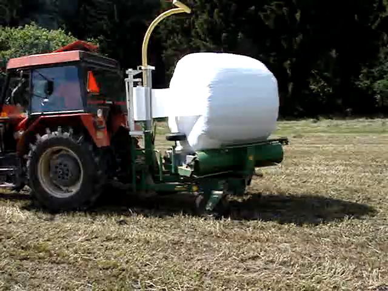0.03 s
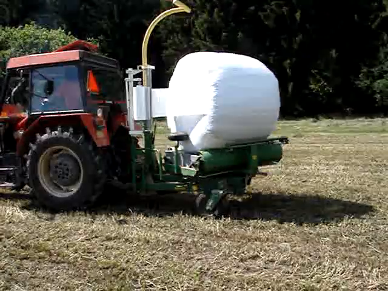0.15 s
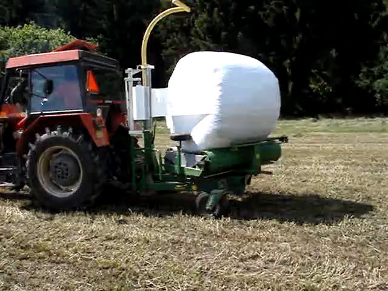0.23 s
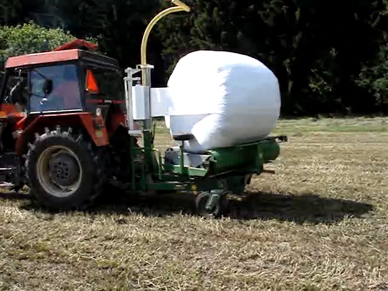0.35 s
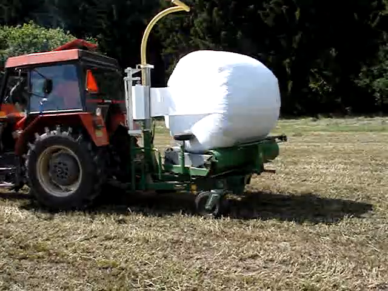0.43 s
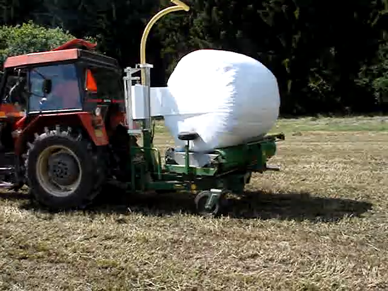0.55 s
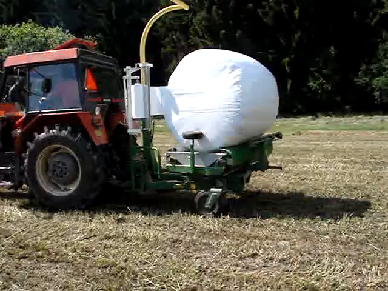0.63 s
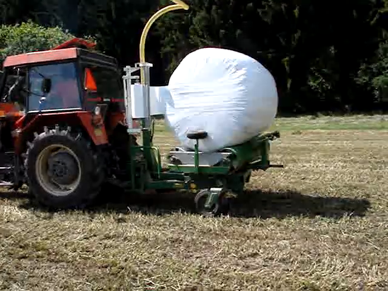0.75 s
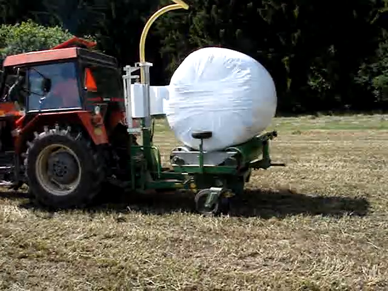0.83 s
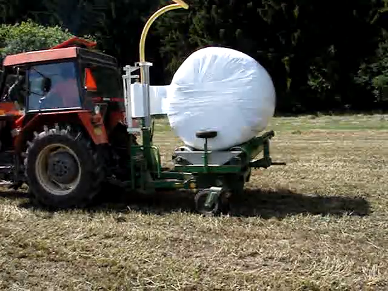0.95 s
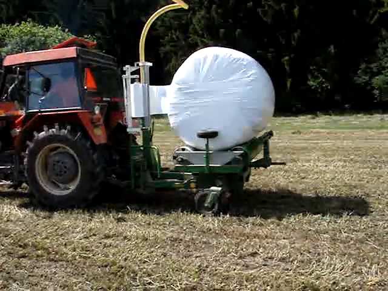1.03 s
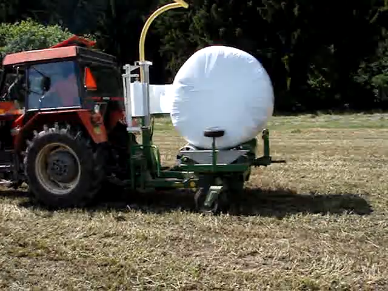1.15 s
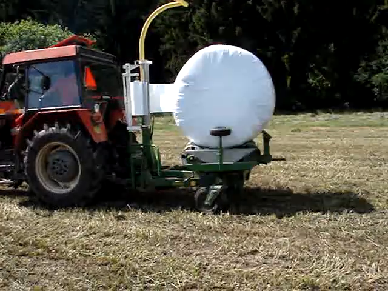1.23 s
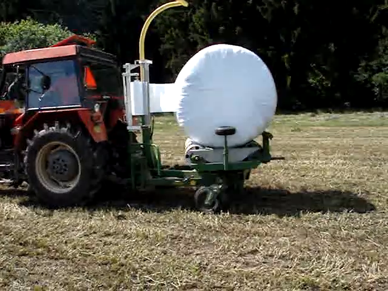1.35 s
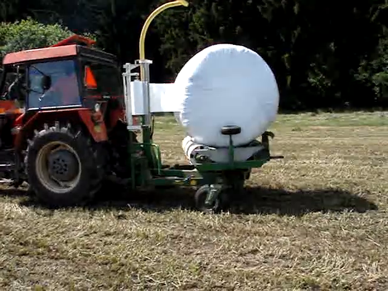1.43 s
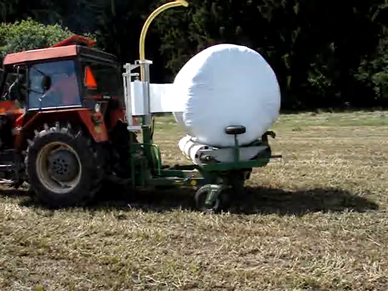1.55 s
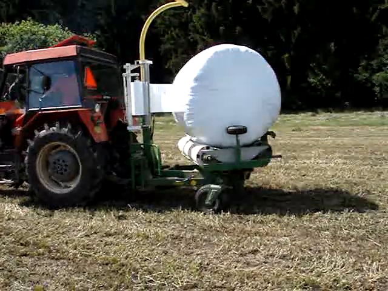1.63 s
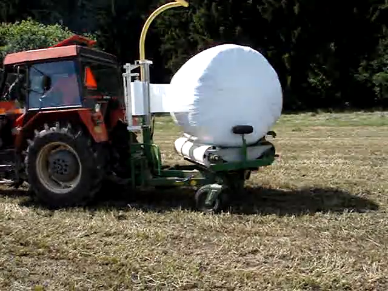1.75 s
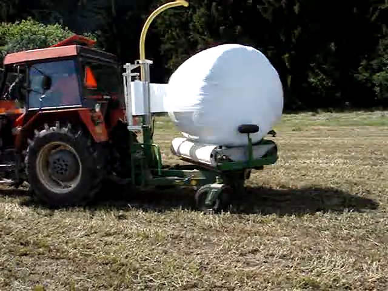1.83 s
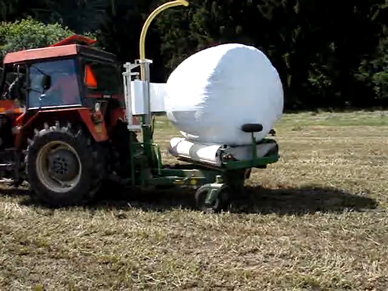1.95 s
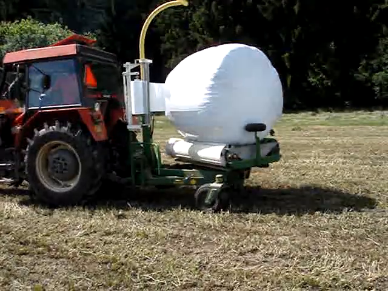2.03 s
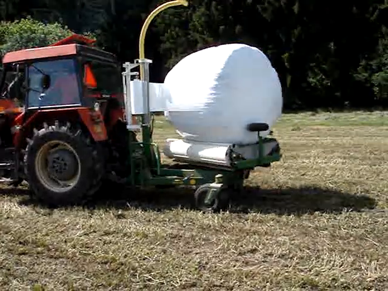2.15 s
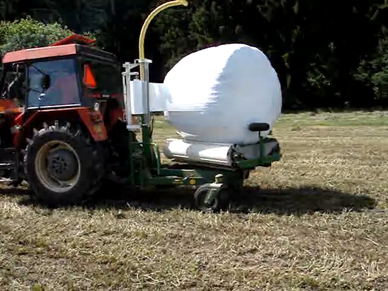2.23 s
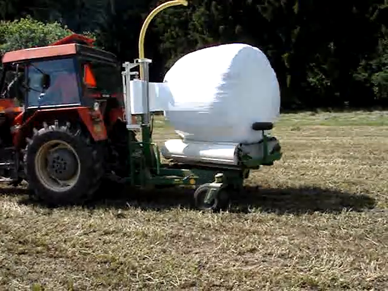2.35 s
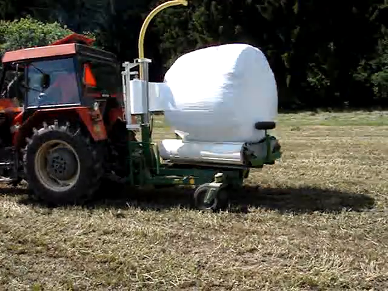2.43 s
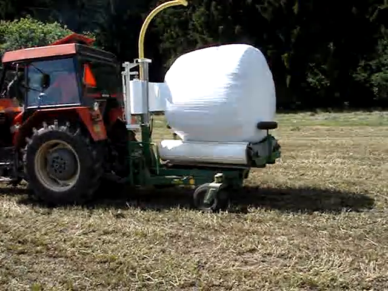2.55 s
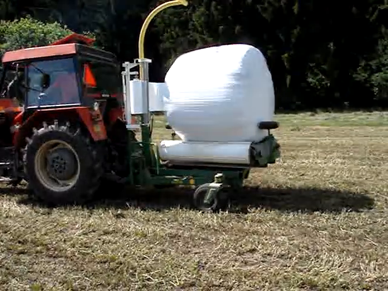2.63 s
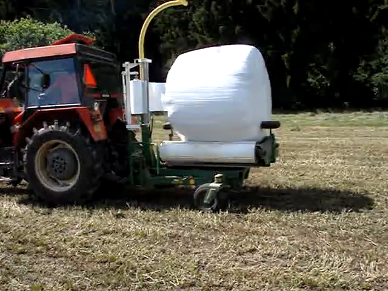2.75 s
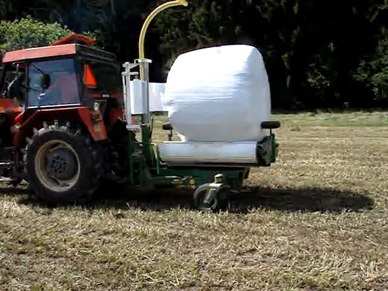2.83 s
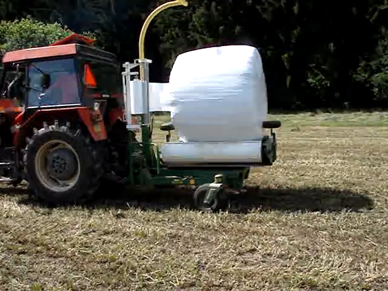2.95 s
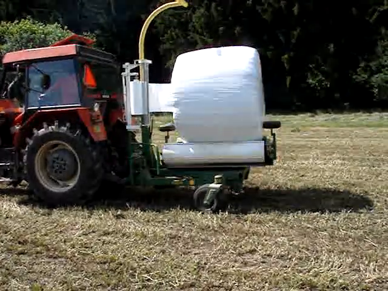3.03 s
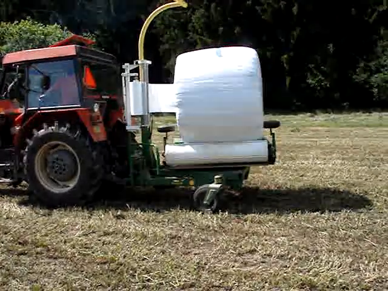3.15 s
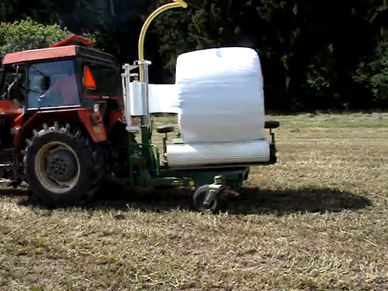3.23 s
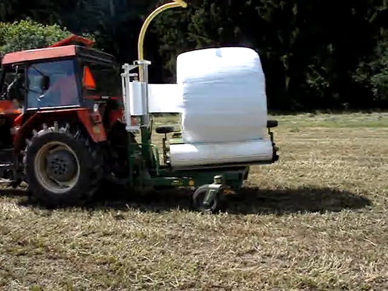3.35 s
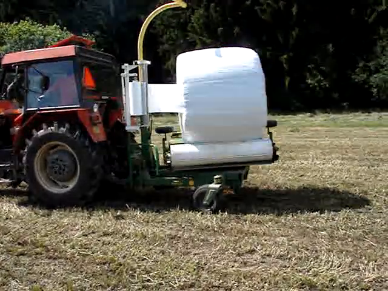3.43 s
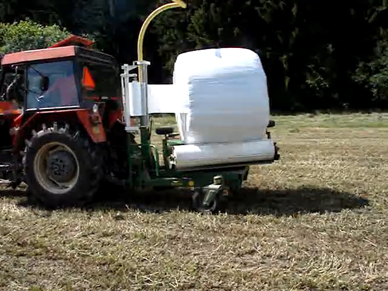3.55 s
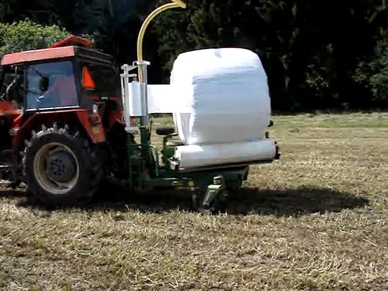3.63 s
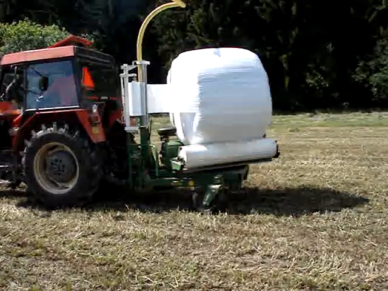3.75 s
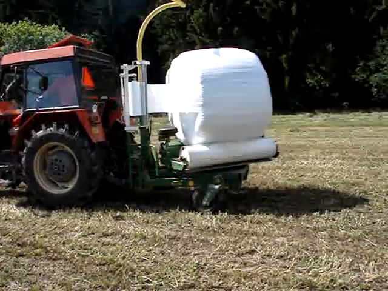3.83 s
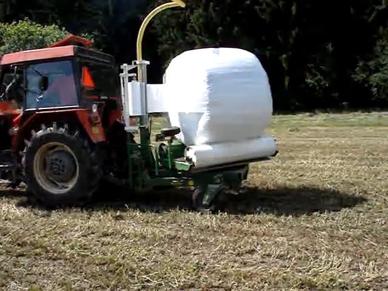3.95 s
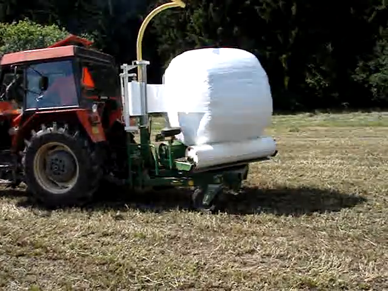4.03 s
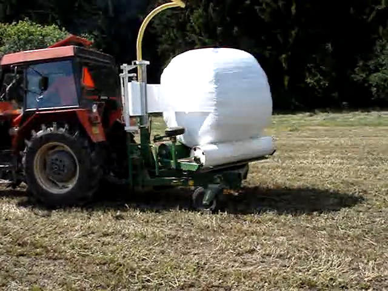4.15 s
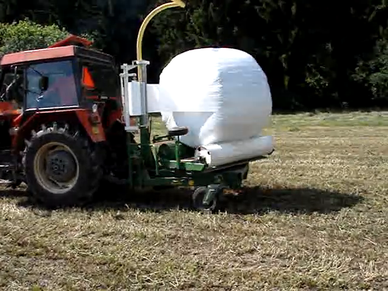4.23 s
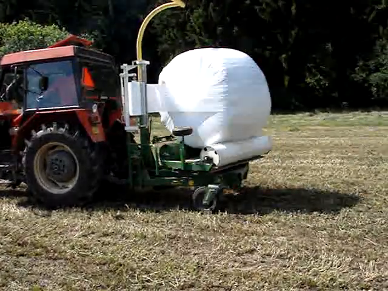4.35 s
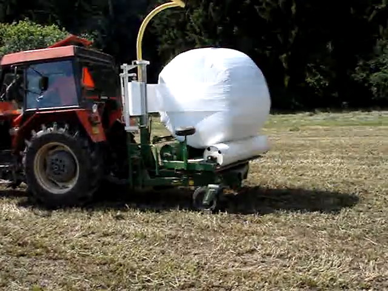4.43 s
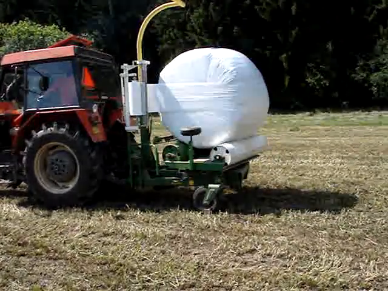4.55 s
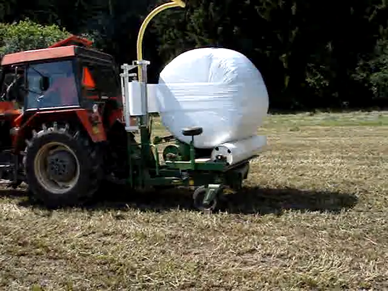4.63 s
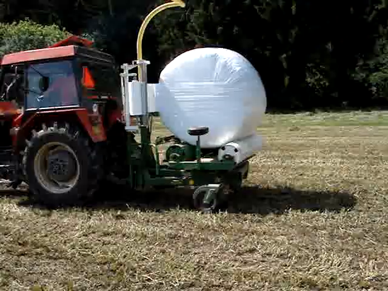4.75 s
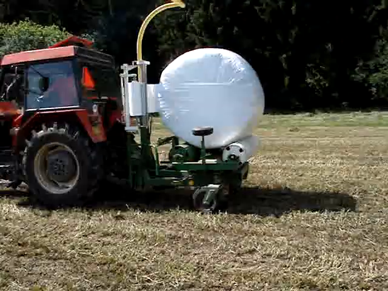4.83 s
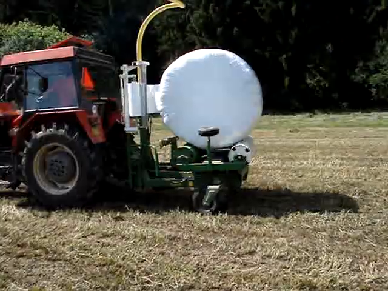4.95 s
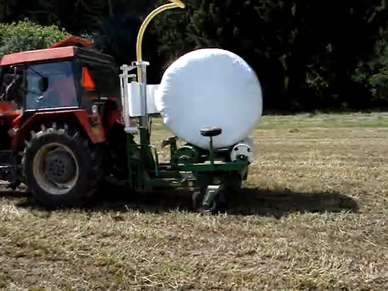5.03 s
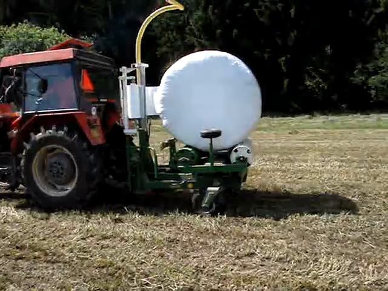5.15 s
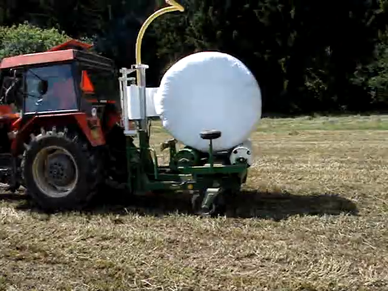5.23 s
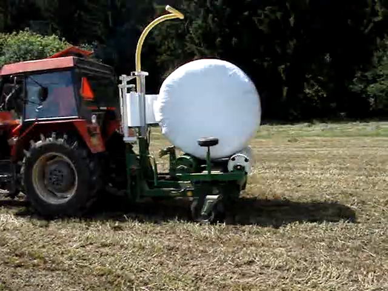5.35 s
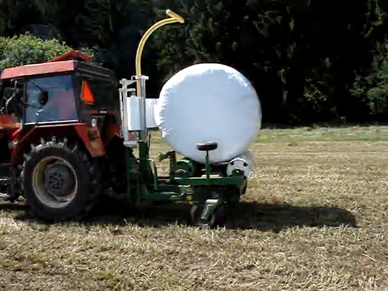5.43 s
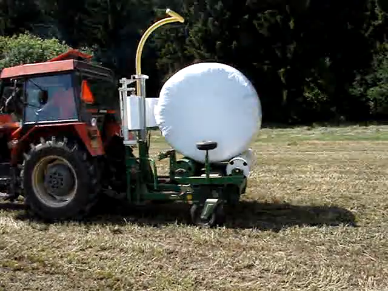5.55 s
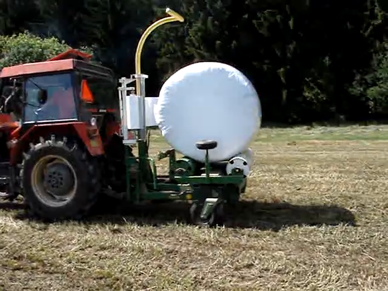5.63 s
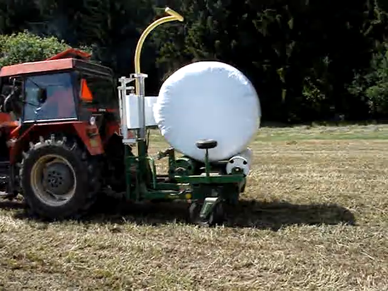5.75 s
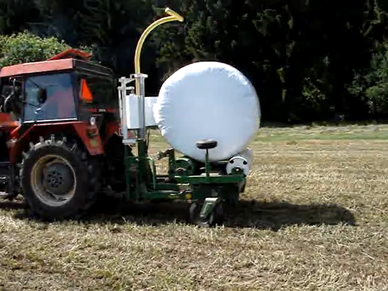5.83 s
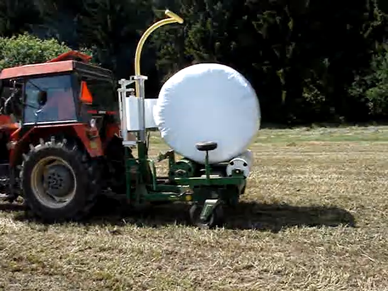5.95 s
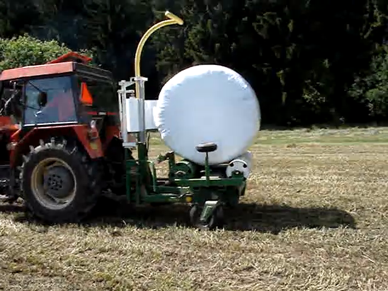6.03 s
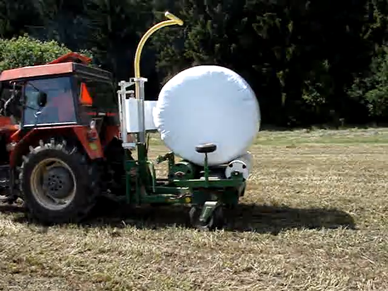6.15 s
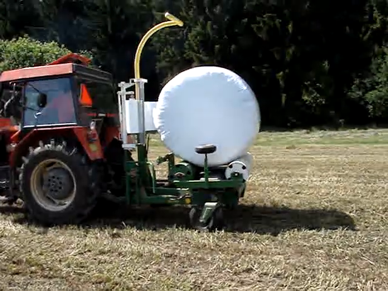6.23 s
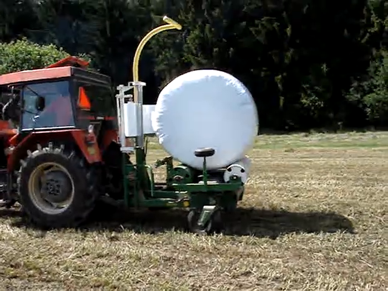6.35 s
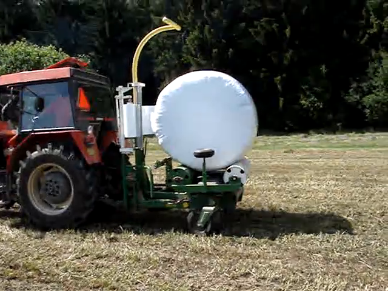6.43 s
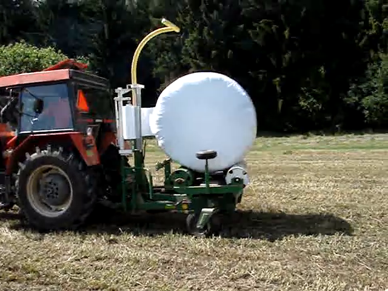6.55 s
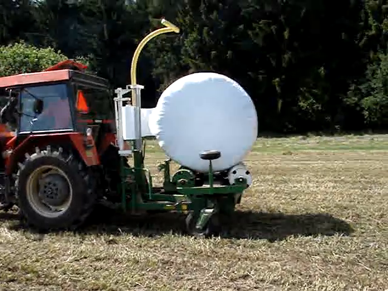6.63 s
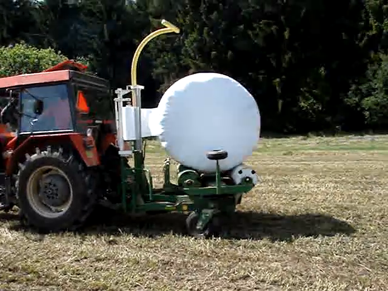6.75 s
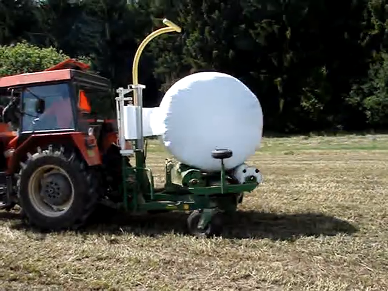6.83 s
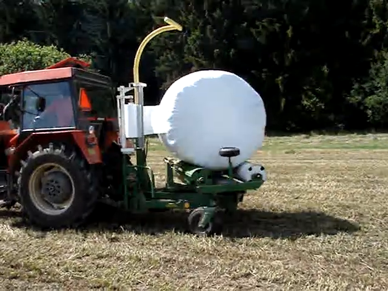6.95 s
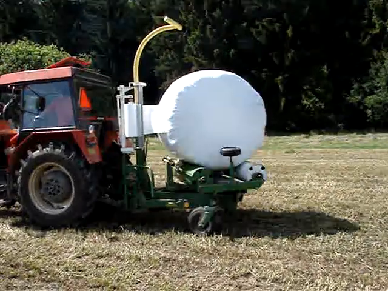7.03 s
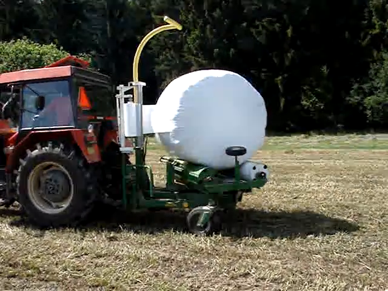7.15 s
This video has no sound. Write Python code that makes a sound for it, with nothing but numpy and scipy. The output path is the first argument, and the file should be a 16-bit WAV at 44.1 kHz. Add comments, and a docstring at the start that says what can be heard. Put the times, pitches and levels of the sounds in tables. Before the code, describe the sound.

Stretch film peels off a bale wrapper's roll with a dense, bright crackle and a rasp, while a diesel tractor idles underneath. After about five seconds the film stops, and the engine's knock and a low hydraulic hum come forward. A valve clacks, and the film starts tearing again. The machine stands straight ahead of the microphone in an open field.

```python
"""Stretch film rips off a bale wrapper's roll in thousands of tiny slips a second, which crackle at
the peel line and rasp on the taut sheet. A four-cylinder diesel tractor idles in front, in an open field.
The turntable brakes to a stop, the hydraulic pump's hum swells, and the engine's knock comes forward
as the recorder's gain control recovers. Then a valve clacks and the film tears on."""
import sys
import numpy as np
from scipy import signal
from scipy.fft import rfft, irfft
from scipy.io import wavfile
from scipy.ndimage import uniform_filter1d

SR = 44100
rng = np.random.default_rng(int(sys.argv[2]) if len(sys.argv) > 2 else 0)


def master_out(mix):
    """Clip the mix to full scale and print it as 16-bit PCM to the path in sys.argv[1]."""
    frames = np.transpose(np.atleast_2d(mix))
    ceiling = np.clip(frames, -1, 1)
    pcm = np.round(ceiling * 32767).astype(np.int16)
    wavfile.write(sys.argv[1], SR, pcm)


N = 317066
TIME = np.arange(N) / SR
STOP_S, START_S = 5.282, 6.659  # the turntable rests between these moments


def from_db(db):
    """Decibels to amplitude."""
    return 10 ** (np.asarray(db) / 20)


def rms_one(x):
    """The signal scaled to an rms of 1."""
    return x / np.sqrt(np.mean(x ** 2) + 1e-20)


def ramp(age, length_s):
    """Straight rise from 0 to 1."""
    return np.clip(age / length_s, 0, 1)


def swell(s, half_s):
    """Smooth bump of height 1 around a moment."""
    return np.exp(-((TIME - s) / half_s) ** 2)


def burst(age, rise_s, decay_s):
    """Envelope that swells quickly and dies away."""
    age = np.maximum(age, 0)
    return (1 - np.exp(-age / rise_s)) * np.exp(-np.minimum(age / decay_s, 50))


def drift(hz):
    """Smooth random wander of rms 1, mostly slower than hz."""
    hop, settle = 40, 2000
    r = np.exp(-2 * np.pi * hz * hop / SR)
    slow = signal.lfilter([1], [1, -2 * r, r * r], rng.standard_normal(N // hop + settle + 2))[settle:]
    return np.interp(np.arange(N) / hop, np.arange(len(slow)), rms_one(slow))


def clicks(per_s, spread_db):
    """Random train of tiny impulses of uneven size; rms 1."""
    sizes = from_db(spread_db * np.clip(rng.standard_normal(N), -2, 2)) * rng.choice([-1, 1], N)
    return rms_one(sizes * (rng.random(N) < per_s / SR))


def colour(x, spectrum, size=4096):
    """Minimum-phase EQ of unit power gain, falling steeply beyond the spectrum's ends."""
    hz, db = np.transpose(spectrum)
    octave = np.log2(np.maximum(np.fft.rfftfreq(size, 1 / SR), 1))
    knots = np.log2(hz)
    outside = np.abs(octave - np.clip(octave, knots[0], knots[-1]))
    curve_db = np.interp(octave, knots, db) - 60 * np.minimum(outside, 1)
    cepstrum = irfft(np.log(from_db(curve_db)))
    cepstrum[1:size // 2] *= 2  # folded, so nothing rings ahead of a click
    cepstrum[size // 2 + 1:] = 0
    response = irfft(np.exp(rfft(cepstrum)))
    return signal.fftconvolve(x, response / np.linalg.norm(response))[:N]


def resonance(x, hz, width):
    """Two-pole band-pass with gain 1 at its peak; width in Hz."""
    r = np.exp(-np.pi * width / SR)
    poles = [1, -2 * r * np.cos(2 * np.pi * hz / SR), r * r]
    return signal.lfilter(np.array([1, 0, -1]) * (1 - r * r) / 2, poles, x)


def tone(cycles, db):
    """Sine at an rms level in dB."""
    return from_db(db) * np.sqrt(2) * np.sin(2 * np.pi * cycles)


def pump_hum(firings):
    """The hydraulic pump hums at nine times the firing rate, loudest while the turntable rests."""
    work_db, rest_db = -69, -57.5
    resting = ramp(TIME - 5.44, length_s=0.15) - ramp(TIME - START_S, length_s=0.27)
    return tone(9 * firings, work_db + (rest_db - work_db) * resting + 2.2 * drift(9))


def exhaust_drone(firings):
    """Exhaust and belt-driven fan hold low tones that follow the engine's speed."""
    # The drone's partials. Each row: multiple of the firing rate, level in dB.
    partials = [(2, -73.5), (3.08, -71), (4, -69.5), (5, -73), (6, -72.5), (7, -71), (8, -67.5), (18, -72)]
    return sum(tone(order * firings + rng.random(), db + 1.3 * drift(3)) for order, db in partials)


def engine_rumble(age):
    """A bed of low noise that throbs just after each firing."""
    # The rumble's colour. Each row: frequency in Hz, relative level in dB.
    rumble_eq = [(35, -41), (60, -15), (155, -9.5), (204, -3.5), (236, -6), (407, -6), (579, -25.5),
                 (841, -11.5), (900, -5), (1170, -38), (1980, -120)]
    throb = rms_one(1 + 1.1 * burst(age - 0.008, rise_s=0.004, decay_s=0.02))
    rumble = colour(rng.standard_normal(N), rumble_eq) * throb
    return from_db(-54) * signal.sosfilt(signal.butter(2, 70, "high", fs=SR, output="sos"), rumble)


def diesel_knock(firings, age):
    """Every firing knocks on the block, and the valve gear clatters after it."""
    # The accent of each cylinder in dB, in firing order.
    cylinder_db = [2.5, -0.5, -0.2, 0]
    # The colour of knock and clatter. Each row: frequency in Hz, relative level in dB.
    knock_eq = [(260, -28.5), (450, -14), (585, -8), (903, -5), (1040, -11.5), (1220, -6), (1530, -3.5),
                (1760, -8.5), (2240, -4), (2420, -9.5), (3780, -14.5), (5180, -23.5), (6070, -25),
                (9240, -31), (10400, -43.5), (13500, -86), (22000, -120)]
    # The ring of the engine block. Each row: frequency in Hz, width in Hz, relative level in dB.
    block_modes = [(1240, 78, -4.5), (1340, 70, -1.5), (1550, 82, -7), (2245, 61, -7), (2860, 220, -1),
                   (3730, 170, 4), (4400, 390, -2.5), (5900, 440, -1.5)]
    cylinder = np.floor(firings).astype(int) % len(cylinder_db)
    strength = from_db(np.array(cylinder_db)[cylinder] + 0.82 * drift(8.9))
    blows = strength * burst(age, rise_s=0.00091, decay_s=0.015)
    knock = colour(blows * clicks(per_s=20000, spread_db=1.5), knock_eq)
    # no two blows excite the block's modes alike
    ring = sum(from_db(db + 2 * drift(9.2)) * resonance(knock, hz, width)
               for hz, width, db in block_modes)
    gear_pulse = rms_one(0.54 + burst(age - 0.013, rise_s=0.0015, decay_s=0.014))
    clatter = colour(gear_pulse * clicks(per_s=6000, spread_db=2), knock_eq)
    return from_db(-40) * rms_one(0.38 * knock + ring) + from_db(-44) * clatter


def tractor():
    """The idling diesel: knock, rumble, exhaust and pump all keep time with its firings."""
    # The slightly uneven idle. Each row: time in seconds, firings per second.
    idle_speed = [(0, 22.8), (5.1, 22.6), (5.3, 21.9), (5.6, 22.05), (5.68, 23.0), (6.55, 23.0),
                  (6.61, 22.1), (7.19, 22.6)]
    first_cylinder_s = 5.677  # a moment at which the first cylinder fires
    firing_hz = np.interp(TIME, *np.transpose(idle_speed))
    firings = np.cumsum(firing_hz) / SR
    firings -= np.interp(first_cylinder_s, TIME, firings)
    age = firings % 1 / firing_hz  # seconds since the last firing
    return diesel_knock(firings, age) + engine_rumble(age) + exhaust_drone(firings) + pump_hum(firings)


def valve_clack(at_s):
    """The hydraulic valve opens with a spit, a short rush and a metal ring."""
    # The colour of the rush. Each row: frequency in Hz, relative level in dB.
    rush_eq = [(400, -16), (700, -2), (1300, -2), (1900, 2), (2600, 2), (3900, -4), (5000, -9), (8500, -25),
               (10000, -36)]
    # The valve's ring. Each row: frequency in Hz, level in dB, seconds to fade by 60 dB.
    valve_modes = [(563, -46, 0.66), (690, -41, 0.33), (1860, -25.5, .08)]
    age = np.maximum(TIME - at_s, 0)
    spit = burst(age, rise_s=0.0005, decay_s=0.01) * rng.standard_normal(N)
    spit = resonance(resonance(spit, hz=7600, width=2700), hz=7600, width=2700)
    rush = colour(burst(age, rise_s=0.0057, decay_s=0.028) * rng.standard_normal(N), rush_eq)
    ring = sum(from_db(db) * burst(age, 0.0068, t60 / np.log(1000)) * np.sin(2 * np.pi * hz * age)
               for hz, db, t60 in valve_modes)
    return from_db(-28.5) * spit + from_db(-27.5) * rush + ring


def turntable_speed():
    """Share of full speed: the turntable brakes, rests, jerks off at part speed and runs up."""
    jerk_speed = 0.51
    run_up = jerk_speed + (1 - jerk_speed) * ramp(TIME - START_S, length_s=0.13)
    return ramp(STOP_S - TIME, length_s=0.084) + (TIME > START_S) * run_up


def film_gains():
    """Gains of rasp and crackle: both ride the film's speed and the pull on it."""
    # The pull sways as bale and roll turn.
    # Each row: rate in Hz, first crest in seconds, rasp swing in dB, crackle swing in dB.
    sways = [(1.17, 0.32, 0.23, -0.1), (2.2, 0.046, 0.33, 0.18)]
    # The film briefly slackens or tightens.
    # Each row: centre in seconds, half length in seconds, rasp change in dB, crackle change in dB.
    tugs = [(0.768, 0.08, -0.5, -3.5), (1.04, 0.13, 0.8, 0), (2.02, 0.17, -0.5, -1.5),
            (2.574, 0.11, -1, -2.5), (3.582, 0.025, 2.5, 0.5), (4.0, 0.094, -0.5, -1.3),
            (4.198, .08, 1.9, 0), (4.44, .07, 1, -0.2), (6.786, 0.022, 4, 2)]
    pulls = [(np.cos(2 * np.pi * hz * (TIME - s)), rasp, crackle) for hz, s, rasp, crackle in sways]
    pulls += [(swell(s, half_s), rasp, crackle) for s, half_s, rasp, crackle in tugs]
    rasp_db = -25 + sum(db * pull for pull, db, _ in pulls)
    rasp_db += 1.2 * (TIME > START_S)  # the sheet is tighter after the rest
    crackle_db = -26.5 + sum(db * pull for pull, _, db in pulls)
    speed = turntable_speed()
    # the film rustles as it is drawn taut before the start
    take_up = (TIME <= START_S) * np.exp(-np.abs(TIME - START_S) / 0.057)
    return (from_db(rasp_db) * speed + from_db(-44) * take_up,
            from_db(crackle_db) * speed ** 1.62 + from_db(-39.5) * take_up)


def film_rips():
    """The film sticks, then lets go in a dense burst of slips."""
    # The louder rips. Each row: start in seconds, relative level in dB.
    rips = [(0.112, -9), (0.282, -1), (0.327, -14), (2.07, -4), (2.098, -5.5), (2.199, -9), (2.472, -3),
            (2.538, -0.5), (2.586, -5.5), (3.989, -5), (4.249, -8), (6.661, -12.5), (6.785, -3),
            (7.181, -1)]
    envelope = sum(from_db(db) * burst(TIME - s, rise_s=0.00056, decay_s=0.0028) for s, db in rips)
    return envelope * clicks(per_s=9000, spread_db=1.5)


def sheet_singing(peel):
    """The taut sheet sings as a shoulder of the bale swings past, every quarter turn until the stop."""
    # Other notes the sheet sings in passing.
    # Each row: centre in seconds, half length in seconds, pitch in Hz, width in Hz, boost in dB.
    passing_notes = [(2.0, 0.14, 1380, 199, 4), (2.65, 0.47, 880, 50, 5.5), (2.95, 0.21, 1520, 99, 5),
                     (3.6, 0.079, 3740, 100, 4), (4.18, 0.091, 2440, 110, 5)]
    first_shoulder_s, quarter_turn_s = 0.82, 1.61
    shoulder_notes = [(s, 0.2, 1900, 160, 7) for s in np.arange(first_shoulder_s, STOP_S, quarter_turn_s)]
    return sum((from_db(db) - 1) * swell(s, half_s) * resonance(peel, hz, width)
               for s, half_s, hz, width, db in shoulder_notes + passing_notes)


def stretch_film():
    """Slips at the peel line crackle by themselves and drum on the taut sheet."""
    # The colours of the sheet's midrange rasp, the peel line's bright crackle and the sheet's low
    # flutter. Each row: frequency in Hz, relative level in dB.
    rasp_eq = [(250, -58.5), (430, -30), (553, -17), (634, -10), (770, -2), (956, -11), (1110, -4),
               (1260, 1), (1380, -1), (1580, -7), (1740, -5), (1920, -8), (2140, -19.5), (2400, -21),
               (3120, -55.5), (5280, -120)]
    crackle_eq = [(1240, -31.5), (2100, -5.5), (2290, -12), (2550, 0.5), (3140, 1.5), (3710, 0.5),
                  (4130, -7.5), (4500, -6.5), (5120, -8), (6380, -1.5), (7200, -1.5), (9410, -12),
                  (10100, -19.5), (10400, -59), (13500, -61.5), (22000, -120)]
    flutter_eq = [(15, 7), (50, 3), (130, -11.5), (250, -7), (370, 9), (500, -6.5), (700, -10)]
    rasp_gain, crackle_gain = film_gains()
    shared_slips = clicks(per_s=1900, spread_db=3.5)
    tack = rms_one(from_db(0.98 * drift(130) + 0.22 * drift(23)))  # the cling is patchy along the film
    sheet_slips = rms_one(shared_slips + from_db(-0.5) * clicks(per_s=4000, spread_db=4)) * tack
    edge_slips = rms_one(shared_slips + from_db(-3.5) * clicks(per_s=7000, spread_db=1)) * tack
    rips = film_rips()
    rasp = colour(rasp_gain * sheet_slips + from_db(-9) * rips, rasp_eq)
    rasp += 0.2 * drift(64) * resonance(rasp, hz=1360, width=440)  # the sheet's main resonance throbs
    crackle = colour(crackle_gain * edge_slips + from_db(-17) * rips, crackle_eq)
    crackle += 0.36 * drift(90) * resonance(crackle, hz=6340, width=2100)  # some slips are brighter
    flutter = from_db(-31.5) * rasp_gain * colour(sheet_slips, flutter_eq)
    peel = rasp + crackle + flutter
    film = peel + sheet_singing(peel)
    ground_echo = 0.067 * np.interp(TIME - 0.0035, TIME, film, left=0)
    return film + ground_echo


def scene():
    """Tractor and wrapper stand straight ahead, with no walls near them."""
    return np.tile(stretch_film() + tractor() + valve_clack(at_s=6.436), (2, 1))


def gain_lift(x, threshold_db, release_db_per_s, attack_s, hop=220):
    """Gain in dB that creeps up while the sound is quiet and falls back once it is loud."""
    power = np.abs(uniform_filter1d(x * x, 4 * hop)[::hop])
    level_db = 10 * np.log10(power + 1e-12)
    step_s, lift = hop / SR, [0.]
    for db in level_db[1:]:
        loud = np.clip((db - threshold_db) / 2, 0, 1)
        lift.append(lift[-1] * np.exp(-loud * step_s / attack_s) + (1 - loud) * release_db_per_s * step_s)
    return np.interp(TIME, np.arange(len(lift)) * step_s, lift)


def record(dry):
    """Mono recorder: gain control that works harder on the bass, then a steep top cut."""
    crossover_hz, top_cut_hz = 480, 10100
    mono = dry.mean(axis=0)
    bass = signal.sosfiltfilt(signal.butter(2, crossover_hz, fs=SR, output="sos"), mono)
    bass_lift = gain_lift(mono, threshold_db=-31.5, release_db_per_s=10, attack_s=0.078)
    top_lift = gain_lift(mono, threshold_db=-33.5, release_db_per_s=5.5, attack_s=0.069)
    levelled = bass * from_db(bass_lift) + (mono - bass) * from_db(top_lift)
    top_cut = signal.ellip(12, 0.1, 90, top_cut_hz, fs=SR, output="sos")
    return np.tile(signal.sosfilt(top_cut, levelled), (2, 1))


dry = scene()
out = record(dry)
master_out(out)
```